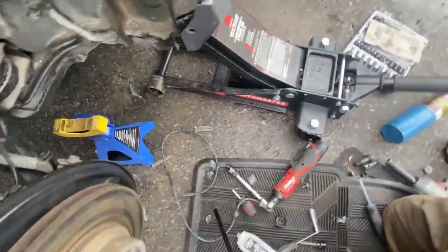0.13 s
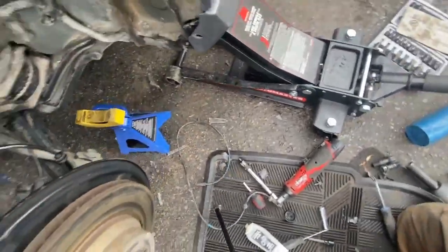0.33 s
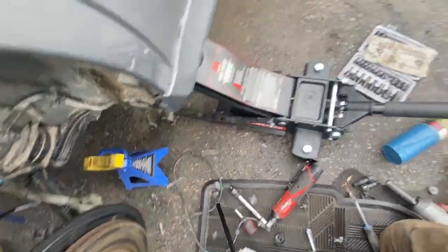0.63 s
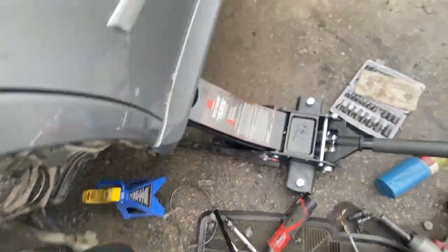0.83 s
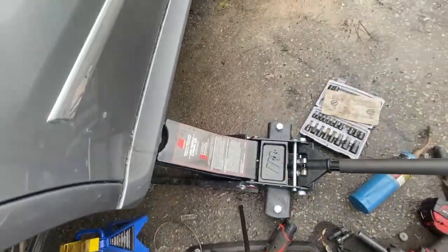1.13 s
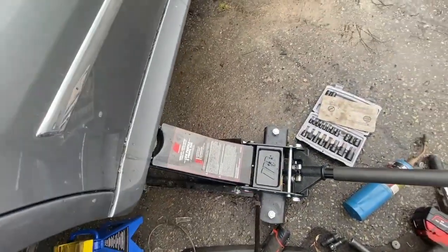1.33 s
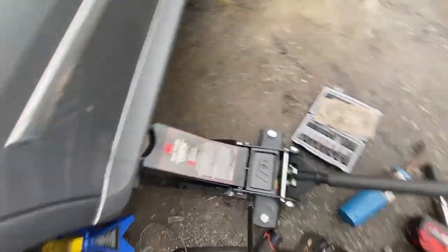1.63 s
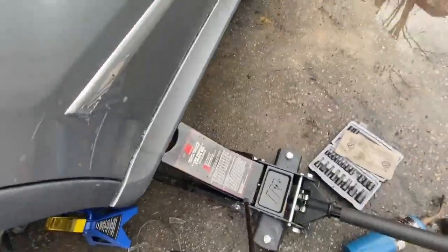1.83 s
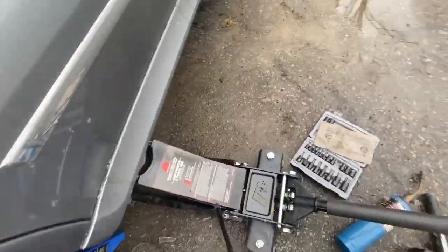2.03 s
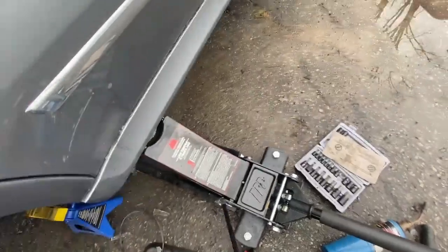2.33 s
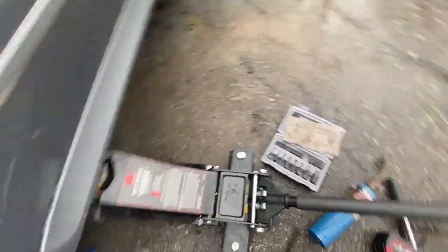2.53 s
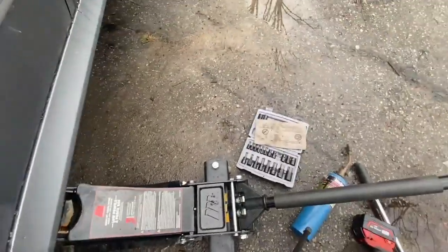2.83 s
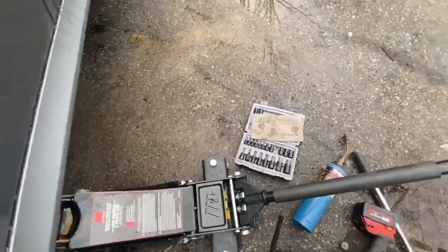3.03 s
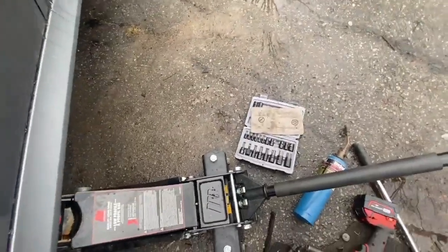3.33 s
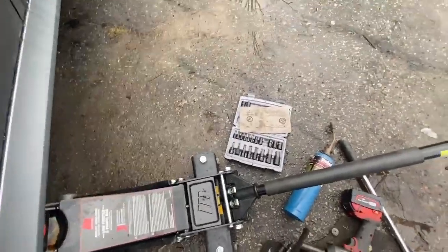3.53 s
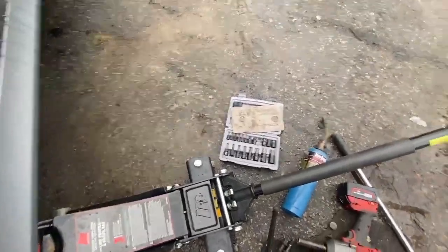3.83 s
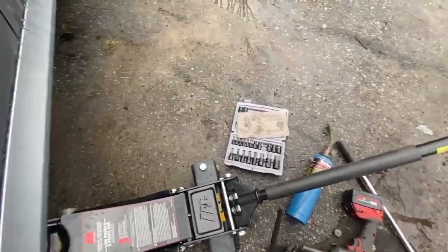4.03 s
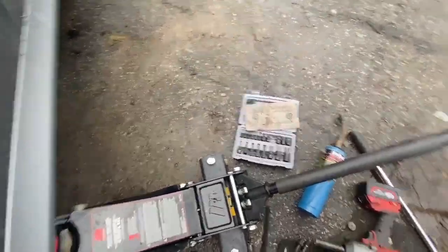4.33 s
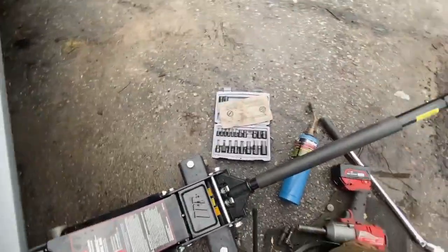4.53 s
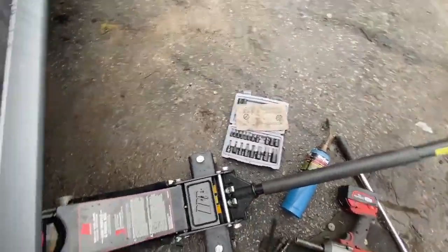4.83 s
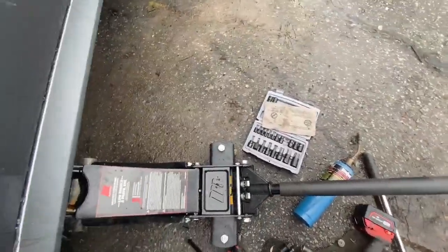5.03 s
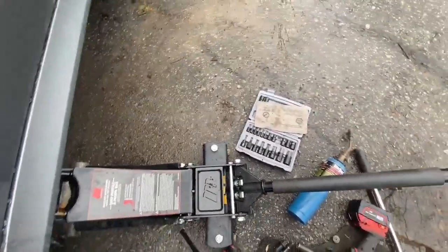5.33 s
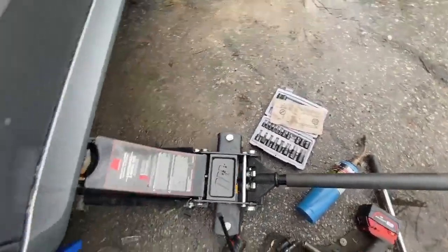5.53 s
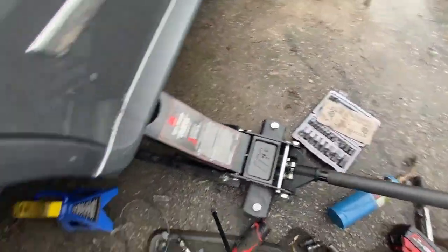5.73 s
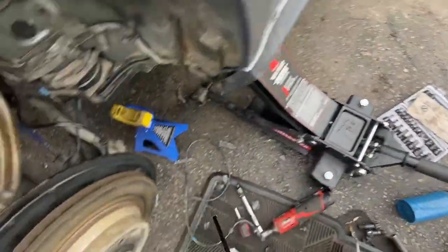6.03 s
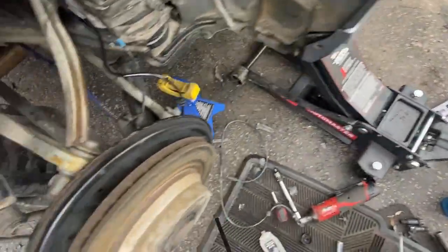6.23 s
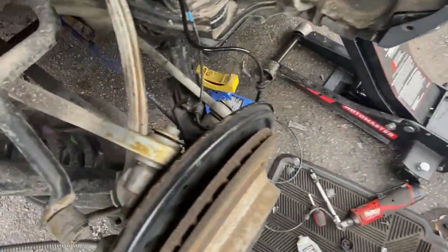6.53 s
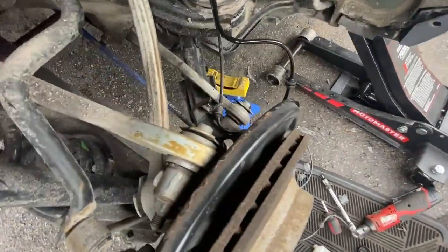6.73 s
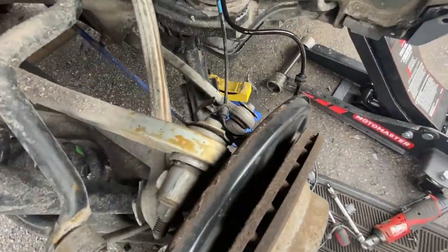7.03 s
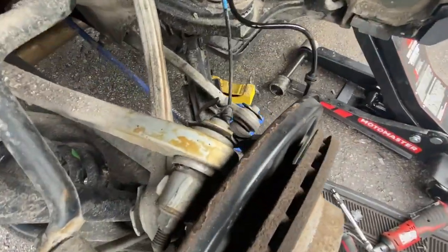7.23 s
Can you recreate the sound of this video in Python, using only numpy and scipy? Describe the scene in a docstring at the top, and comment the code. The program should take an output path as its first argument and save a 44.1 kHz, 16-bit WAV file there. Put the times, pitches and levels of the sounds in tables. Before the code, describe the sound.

Loose steel jack handle clanks and rattles irregularly in its socket on an outdoor driveway, with scuffs, metal rubbing, one creak, then low rumbling quiet.

```python
"""First a scuff of cloth and soles over a low outdoor rumble, then the rattle of a steel floor jack on a driveway.
The long loose handle strikes in its socket: each blow sets off decaying modes of tube and frame and a noise crash.
Between blows the joint rubs as random slips into the frame, and creaks once as a train of stick-slip snaps.
A wall six or seven metres off returns one smeared echo; low thuds pass into the ground.
A tap, a thin whistle and a steady wash lie behind; at the microphone peaks are rounded and the top is cut."""
import sys
import numpy as np
from scipy import signal
from scipy.fft import rfft, irfft, next_fast_len
from scipy.io import wavfile
from scipy.ndimage import uniform_filter1d

SR = 44100
rng = np.random.default_rng(int(sys.argv[2]) if len(sys.argv) > 2 else 0)


def put_to_file(sound):
    """Save the sound as 16-bit audio at rate SR, in the file named by the first command-line argument."""
    columns = np.atleast_2d(sound).T  # one column per channel
    safe = np.clip(columns, -1, 1)
    whole_steps = np.round(safe * 32767)
    wavfile.write(sys.argv[1], SR, whole_steps.astype(np.int16))


N = 326063
TIME = np.arange(N) / SR
AGE = np.arange(SR // 5) / SR   # seconds since a blow

# Blows of the handle in its socket. Each row: start in seconds, contact time in seconds, strength in dB,
# looseness from 0 (seated against the frame) to 1 (hanging free).
HANDLE_BLOWS = [(0.1376, .0016, -41, 0.45), (0.1715, 0.0014, -39.5, .15), (.183, 0.00056, -33, 0.17),
                (.2137, 0.00064, -36, .15), (0.5833, 0.0016, -20.5, 0.28), (0.6507, 0.001, -29, 0.78),
                (0.7715, 0.0014, -22.5, 0.66), (1.017, 0.0006, -25.5, 0.65), (1.5677, 0.0016, -37, 0.23),
                (1.5927, 0.0023, -34, 0.38), (1.6908, 0.001, -17.5, 0.67), (1.783, .0017, -26, 0.089),
                (1.8767, 0.0018, -21, 0.74), (2.1118, .001, -29, 0), (2.1668, 0.0024, -43.5, 0),
                (2.221, 0.0011, -26, 1), (2.3349, 0.0021, -23, 0.12), (2.427, 0.0019, -18.5, 0.56),
                (2.6521, 0.0016, -30.5, 0), (2.6554, 0.0029, -23.5, 0.49), (2.6741, .0013, -24, 1),
                (2.7013, 0.001, -25.5, 0.32), (2.7108, 0.00124, -20.5, 1), (2.8268, 0.0019, -41, 0.48),
                (2.847, 0.00058, -41, 0.66), (2.9078, .0012, -45, 0.61), (2.9796, 0.00094, -38, 0.29),
                (3.06, 0.0027, -27.5, 0.36), (3.0657, 0.0021, -25.5, .2), (3.1036, .0011, -37, 0.66),
                (3.117, 0.0012, -39, .4), (3.1258, 0.0011, -19.5, 0.53), (3.1927, 0.0016, -25, 0.19),
                (3.2319, 0.00088, -40, 0.34), (3.2542, 0.0012, -17, 0.87), (3.373, 0.00092, -40, 0.21),
                (3.4149, 0.0037, -31.5, 0.13), (3.43, 0.0012, -23.5, 0.25), (3.457, 0.0018, -39, 0.65),
                (3.4878, 0.0019, -23, 0.85), (3.5471, 0.0016, -25.5, 0.37), (3.5978, 0.00078, -16, 0.82),
                (3.714, .0003, -37.5, 0.22), (3.7322, 0.00087, -44, 0.08), (3.792, 0.0014, -29, 0.11),
                (3.7991, 0.0019, -28, 0.28), (3.844, 0.0018, -33, 0.59), (3.8526, 0.0012, -21, 0.59),
                (3.9329, 0.0023, -33.5, 0.27), (3.998, 0.0029, -16.5, 0.9), (4.066, 0.00066, -42, .4),
                (4.2233, 0.00087, -50, 0.14), (4.4062, 0.00065, -43, 0.15), (4.4273, 0.00071, -41.5, 0.48),
                (4.5606, 0.0019, -31, 0.32), (4.58, 0.0019, -42.5, 0.045), (4.609, 0.0018, -36, 0.56),
                (4.63, 0.001, -24, 0.62), (4.787, .002, -46, 0.76), (4.8054, 0.00045, -32, 0.69),
                (4.8169, 0.0011, -32.5, 0.59), (4.843, .001, -45, 0.41), (4.892, 0.001, -38.5, 0.23),
                (4.991, .0023, -20.5, 1), (5.245, 0.00093, -47, 0.57), (5.331, .0013, -26, 0.32),
                (5.3673, 0.0014, -36, 0.37), (5.3808, .0022, -19, 0.59), (5.3897, 0.0022, -29, 0.43),
                (5.5008, 0.0016, -39.5, 0.16), (5.5546, 0.0012, -37.5, 0.27), (5.6071, 0.0015, -22.5, 0.64),
                (6.2393, 0.0033, -53, 0.31), (6.302, 0.003, -49, 0.21), (7.3398, 0.00069, -40, 0),
                (7.3471, 0.0025, -39.5, 0.029)]
# How a blow feeds knock, clack, clang, ting and shimmer. Each row: share when seated in dB, share when loose in dB,
# growth in dB per dB of strength.
BLOW_DRIVE = [(0, -26, 0.81), (-6.5, -17, 1), (-3, 1.5, .97), (3, -4.5, 1.09), (-23.5, -10.5, 0.8)]
FIRM_BLOW_DB = -25   # the strength at which these shares hold
# Registers of knock, clack, clang, ting and shimmer. Each row: low edge in Hz, high edge in Hz,
# crash of dense weak modes in dB, its t60 in seconds, lingering ring in dB, onset delay in seconds.
REGISTERS = [(151, 790, -5.5, 0.033, -43, 0.00026), (905, 3797, 2.5, 0.017, -20.5, .0001),
             (3430, 5626, 0.5, 0.015, -15, .0001), (5540, 12400, 1, 0.023, -11.5, .0005),
             (11600, 18600, 13, 0.018, -12, .0004)]
# Modes of the frame (low) and handle (high). Each row: pitch in Hz, level when seated in dB,
# level when loose in dB, t60 in seconds.
JACK_MODES = [(210.7, -9, 3, 0.054), (315, 0, -1.5, 0.012), (438, 3, 4.5, 0.043), (483.5, 3.5, 2.5, 0.035),
              (573, 0, -13.5, 0.042), (627, 0, -3, 0.044), (680, -1.5, -15, 0.053), (1780, -20, 9, 0.025),
              (1804, 3.5, 1, 0.013), (2140, 2, -40, 0.026), (2600, 13.5, -12, 0.0079),
              (2794, 9, -11, 0.021), (3447, 0, -20.5, 0.078), (3800, 1.5, -15, 0.057),
              (4484, 0, -6.5, 0.022), (4633, 11, -40.5, 0.0094), (5100, 8, 4.5, 0.017),
              (5195, 4.5, 6.5, 0.016), (5320, -16, 10, 0.03), (5550, 7, -5.5, 0.0084),
              (6540, -8, -0.5, 0.014), (7017, 0, 5, 0.035), (7580, -9, 0.5, 0.035),
              (7990, -16, -6.5, 0.0094), (7870, -13, 11, 0.023), (8380, -3, -1, 0.026),
              (9730, 4.5, 0, 0.017), (9670, 0.5, -31, 0.03), (11360, -13.5, -3, 0.026),
              (11260, -16, -10.5, 0.025), (13000, -46, -4.5, 0.11), (13900, -32, 13, .025),
              (15600, -13, -28, 0.048), (15700, -18, -25, 0.038)]
# Pure high ringing after four blows. Each row: start in seconds, level in dB.
RING_OUTS = [(1.019, -32), (2.2225, -20), (4.632, -29.5), (5.334, -34)]
# One dry snap of the joint catching: start in seconds, gain in dB.
SNAP = (0.1833, -8.5)
# Its quickly damped modes. Each row: pitch in Hz, level in dB, t60 in seconds.
SNAP_MODES = [(4450, -1.5, 0.0089), (4800, -1, 0.0062), (9700, -7, 0.0044)]
# The frame rocking and bumping dully on the ground. Each row: start in seconds, level in dB.
FRAME_BUMPS = [(0.922, -38), (1.073, -39.5), (1.1078, -41.5), (1.367, -37), (1.4125, -40), (1.454, -36),
               (1.578, -40), (2.09, -35), (2.869, -37.5), (3.783, -39), (4.528, -32), (5.169, -44.5),
               (5.2933, -36), (5.451, -42), (5.651, -44), (5.694, -39), (7.357, -47)]
BUMP_CONTACT_S, BUMP_RATTLE_DB = 0.00178, -14.5   # a bump stirs the higher registers only faintly
# Strokes of the joint rubbing. Each row: peak time in seconds, length in seconds, level in dB before each layer's gain.
RUB_STROKES = [(0.204, 0.097, -34.5), (1.036, 0.36, -45.5), (1.465, 0.15, -30.5), (1.591, 0.18, -35),
               (1.856, 0.5, -43), (2.105, 0.067, -37.5), (2.355, 0.5, -45.5), (2.62, 0.48, -41),
               (2.794, 0.14, -60), (3.068, 0.17, -36.5), (3.273, 0.16, -38), (3.43, 0.15, -39.5),
               (3.79, 0.3, -39.5), (4.515, 0.16, -37.5), (4.749, 0.23, -41), (5.335, 0.24, -50),
               (5.623, 0.24, -45)]
# Each stroke of rubbing shakes a light tick out of the handle, scattered about the peak by a share of its length.
TICK_DB, TICK_SPREAD_DB, TICK_CONTACT_S, TICK_LOOSENESS = -50, 5, 0.00097, 0.15
TICK_SCATTER = 0.2
# The joint creaking. Each row: time in seconds, slips per second before jitter, level in dB before the creak's gain.
CREAK_SLIPS = [(1.815, 227, -49), (1.861, 200, -33), (1.898, 184, -31), (1.939, 165, -30.5),
               (1.971, 182, -31), (1.998, 120, -32.5), (2.026, 138, -38), (2.05, 95, -44)]
# Thud of the ground: level against its knock in dB, length and lag of its peak in seconds, share of rubbing in dB.
THUD_DB, THUD_S, THUD_DELAY_S, RUB_THUD_DB = -12, 0.044, 0.025, -10.5
# Cloth and soles scuffing. Each row: peak time in seconds, length in seconds, level in dB before the scuff's gain.
SCUFF_STROKES = [(.01, 0.33, -47), (.25, 0.14, -35.5), (.395, 0.16, -36), (.57, 0.26, -40),
                 (.78, 0.52, -46.5), (2.29, 0.61, -49), (2.7, 0.12, -35), (3.54, 0.28, -44),
                 (4.22, 0.28, -43), (4.55, 0.21, -40), (4.77, 0.34, -46.5), (5.69, 0.13, -51),
                 (7.38, 0.11, -49)]
# Spectrum of scuffs and grit. Each row: frequency in Hz, relative density in dB.
SCUFF_COLOUR = [(700, -2.5), (1500, 1.5), (2500, 3.5), (3600, 5), (5200, 3.5), (7000, 1), (10000, -2),
                (15500, -5.5)]
RUB_HISS_DB, RUSTLE_DB = -9.5, -57   # hiss of the joint against its rubbing; steady rustle of clothes
# Every stroke swells alike: share of its length spent rising, fall at its ends in dB, roundness of its top.
RISE_SHARE, EDGE_DB, ROUNDNESS = 0.52, 19, 1.43
# One broad, soft rush of mid-band noise. Each row: peak time in seconds, length in seconds, level in dB.
RUSH_SWELLS = [(.66, 0.67, -40.5)]
# Spectrum of the rush. Each row: frequency in Hz, relative density in dB.
RUSH_COLOUR = [(600, 6.5), (1000, 0), (1600, -2.5), (2400, -10.5)]
# A dull tap further off: start in seconds, gain in dB.
TAP = (7.154, -35.5)
# Its hollow modes. Each row: pitch in Hz, level in dB, t60 in seconds.
TAP_MODES = [(910, 9, 0.024), (1110, -5, 0.05), (1376, -9, 0.058), (1421, 1, 0.044)]
# A faint, thin whistle far off. Each row: peak time in seconds, length in seconds, level in dB.
WHISTLE_SWELLS = [(6.0, 0.2, -52), (7.2, .2, -62)]
WHISTLE_HZ = 3250   # centre of its wavering
# Outdoor rumble. Each row: time in seconds, level in dB before its wavering.
RUMBLE_LEVEL = [(0, -44), (.7, -47), (1.6, -51), (2.3, -50.5), (2.9, -50.5), (3.6, -53), (4.3, -48.5),
                (4.9, -49.5), (5.25, -46), (5.7, -52), (6.2, -42), (7.39, -43.5)]
# Spectrum of the rumble and of the thuds. Each row: frequency in Hz, relative density in dB.
RUMBLE_COLOUR = [(30, -32), (42, -20), (60, 0.5), (100, -2), (160, -3.5), (240, -8.5), (400, -30.5),
                 (900, -30.5)]
# Spectrum of the steady distant wash. Each row: frequency in Hz, relative density in dB.
AIR_COLOUR = [(150, 2), (300, 4), (600, -2.5), (1000, -5.5), (2000, -11), (4000, -17.5), (15000, -32)]
AIR_DB = -52.5
CUTOFF_HZ = 15900


def from_db(db):
    """Decibels to gain."""
    return 10 ** (np.asarray(db) / 20)


def rms_one(x):
    """Scale each row to rms 1."""
    return x / np.sqrt(np.mean(x ** 2, axis=-1, keepdims=True) + 1e-20)


def attack_one(x):
    """Scale each row to rms 1 over its first 10 ms."""
    return x / np.sqrt(np.mean(x[..., :SR // 100] ** 2, axis=-1, keepdims=True) + 1e-20)


def level(rows):
    """Gain in time from rows (seconds, .., dB), practically silent outside them."""
    rows = np.array(rows)
    return from_db(np.interp(TIME, rows[:, 0], rows[:, -1], left=-120, right=-120))


def swells(rows):
    """Gain in time of strokes (peak seconds, length seconds, dB) that rise to a peak and fade."""
    power = np.zeros(N)
    for s, length, db in rows:
        near = slice(max(int((s - 2 * length) * SR), 0), int((s + 2 * length) * SR))
        since = (TIME[near] - s) / length
        away = np.maximum(-since / RISE_SHARE, since / (1 - RISE_SHARE))   # 0 at the peak, 1 at the ends
        power[near] += from_db(db - EDGE_DB * away ** ROUNDNESS) ** 2
    return np.sqrt(power)


def band(x, low, high):
    """Causal band-pass."""
    return signal.sosfilt(signal.butter(2, [low, min(high, .45 * SR)], "band", fs=SR, output="sos"), x)


def drift(rate):
    """Random wander of rms 1, with `rate` knots per second."""
    knots = rng.standard_normal(int(N / SR * rate) + 2)
    return rms_one(np.interp(TIME * rate, np.arange(len(knots)), knots))


def coloured(x, colour):
    """Shape the spectrum of a sound, with falling skirts beyond the table; rms 1."""
    hz, db = np.transpose(colour)
    size = next_fast_len(N, True)
    f = np.maximum(np.arange(size // 2 + 1) * SR / size, 1)
    skirts = np.minimum(f / hz[0], 1) ** 2 * np.minimum(hz[-1] / f, 1) ** 2
    gain = skirts * from_db(np.interp(np.log(f), np.log(hz), db))
    return rms_one(irfft(rfft(x, size) * gain, size)[:N])


def grains(per_s, spread_db):
    """Random tiny contacts of uneven size; rms 1."""
    sizes = from_db(spread_db * np.minimum(rng.exponential(1, N), 4)) * rng.choice([-1, 1], N)
    return rms_one(sizes * (rng.random(N) < per_s / SR))


def dying(t60):
    """Exponential decay by 60 dB in t60 seconds."""
    return np.exp(-np.log(1000) * AGE / t60)


def rings(modes):
    """One decaying sine per mode (Hz, dB, t60)."""
    return np.array([from_db(db) * np.sin(2 * np.pi * hz * AGE) * dying(t60) for hz, db, t60 in modes])


def add(out, s, sound):
    """Mix a sound in at a time in seconds."""
    i = max(int(s * SR), 0)
    out[i:i + len(sound)] += sound[:N - i]


def blows():
    """Times, contact times, looseness and register levels: a seated handle knocks the frame, a loose one rings."""
    chance = rng.standard_normal((len(RUB_STROKES), 2))
    ticks = []
    for (s, length, _), (when, size) in zip(RUB_STROKES, chance):
        at = s + TICK_SCATTER * length * when
        ticks.append((at, TICK_CONTACT_S, TICK_DB + TICK_SPREAD_DB * size, TICK_LOOSENESS))
    s, contact, db, loose = np.transpose(HANDLE_BLOWS + ticks)
    levels = []
    for seated_db, loose_db, growth in BLOW_DRIVE:
        share_db = (1 - loose) * seated_db + loose * loose_db
        levels.append(FIRM_BLOW_DB + growth * (db - FIRM_BLOW_DB) + share_db)
    return np.array([s, contact, loose, *levels])


def bumps():
    """The same for bumps of the frame: a full knock, with little of the handle."""
    rows = []
    for s, db in FRAME_BUMPS:
        middle = (db + BUMP_RATTLE_DB,) * (len(BLOW_DRIVE) - 2)
        rows.append((s, BUMP_CONTACT_S, 0, db) + middle + (db + 2 * BUMP_RATTLE_DB,))
    return np.transpose(rows)


def contact_force(contact):
    """Brief chatter that swells and fades; hard steel contacts drive all pitches about equally."""
    phase = AGE[:SR // 50] / contact[:, None]
    press = phase ** 2 * np.exp(-1.5 * phase)
    # keep the timing of the noise but level its spectrum
    chatter = irfft(np.exp(1j * np.angle(rfft(press * rng.standard_normal(press.shape)))))
    return np.sqrt(press) * chatter


def clinks(hits, linger_t60=0.12, vary_db=5.0, loose_crash_db=-7.5, freeing=1.43, skirt=0.82):
    """Each blow's contact force rings every mode of the jack with a strength of its own."""
    s, contact, looseness, *levels = hits
    force = contact_force(contact)
    # a loose blow lets the tube clang purely; a seated one rattles the small parts
    loose = np.clip(.5 + freeing * (looseness - .5), 0, 1)[:, None]
    out = np.zeros(N)
    for (low, high, dense_db, dense_t60, linger_db, delay), db in zip(REGISTERS, levels):
        hz, seated_db, loose_db, t60 = np.transpose([m for m in JACK_MODES if low <= m[0] < high])
        shape = (len(s), len(hz))
        mode_db = (1 - loose) * seated_db + loose * loose_db
        strength = from_db(mode_db + vary_db * rng.standard_normal(shape))
        body = attack_one((strength * rng.choice([-1, 1], shape)) @ rings(zip(hz, 0 * hz, t60)))
        # all modes also ring on faintly, with strengths drawn anew for every blow
        lingering = np.sqrt(strength) * rng.standard_normal(shape)
        body = body + from_db(linger_db) * attack_one(lingering @ rings((f, 0, linger_t60) for f in hz))
        # the handle sits a little differently each time, which shifts its pitch
        stretch = 1 + .004 * rng.standard_normal(len(s))
        body = np.array([np.interp(AGE * k, AGE, row) for k, row in zip(stretch, body)])
        # the many weak modes of the linkage merge into a short crash
        crash_decay = dying(dense_t60) + .5 * from_db(linger_db) * dying(linger_t60)
        crash = attack_one(band(rng.standard_normal(body.shape) * crash_decay, low, high))
        body = body + from_db(dense_db + loose * loose_crash_db) * crash
        # each part radiates little below its own register
        body = band(body, skirt * low, SR / 2)
        struck = attack_one(signal.fftconvolve(force, body, axes=1))
        for at, sound in zip(s, from_db(db)[:, None] * struck):
            add(out, at + delay, sound)
    return out


def ring_outs(ring_t60=0.065, swell_s=0.0072, vary_db=0.5, lowest_hz=3300, favour=0.65, tilt_db=-5.0):
    """Pure high ringing: sines with a shared decay and a soft onset, tilted in favour of the lower ones."""
    out = np.zeros(N)
    high_modes = []
    for hz, seated_db, loose_db, t60 in JACK_MODES:
        if hz > lowest_hz:
            damping_db = favour * 20 * np.log10(t60)
            high_modes.append((hz, max(seated_db, loose_db) + damping_db + tilt_db * np.log2(hz / lowest_hz)))
    for (s, db), chance in zip(RING_OUTS, rng.standard_normal((len(RING_OUTS), len(high_modes)))):
        modes = rings((hz, mode_db + vary_db * c, ring_t60) for (hz, mode_db), c in zip(high_modes, chance))
        ring = (-1) ** np.arange(len(high_modes)) @ modes * (1 - dying(swell_s))
        add(out, s, from_db(db) * attack_one(band(ring, lowest_hz, SR / 2)))
    return out


def snap():
    """A tight contact of the joint: a few high modes that are damped at once."""
    out = np.zeros(N)
    add(out, SNAP[0], from_db(SNAP[1]) * rings(SNAP_MODES).sum(0) * (1 - dying(0.00085)))
    return out


def frame(force, low_hz, high_hz=900):
    """The seated jack's modes within a range, driven by a force."""
    modes = rings([(hz, db, t60) for hz, db, _, t60 in JACK_MODES if low_hz < hz < high_hz])
    return signal.fftconvolve(force, (-1) ** np.arange(len(modes)) @ modes)[:N]


def rub(rubbing, gain_db=-1., rasp_db=-15.0):
    """Steel sliding on steel: uneven small slips into the frame, with a rasp from the tube."""
    slips = grains(450, 5.4)
    rasp = from_db(rasp_db) * rms_one(frame(slips, 3100, 8000))
    return from_db(gain_db) * rubbing * (rms_one(frame(slips, 250)) + rasp)


def jingle(rubbing, per_s=70, gain_db=-12, limit_db=-40):
    """While the joint rubs, the handle chatters lightly in its socket."""
    chatter = rms_one(frame(grains(per_s, 10.0), 3100, 12000))
    return from_db(gain_db) * np.minimum(rubbing, from_db(limit_db)) * chatter


def creak(jitter=.085, uneven_db=2.0, snap_db=-16.5, rasp_db=-11., groan_db=-2.0, gain_db=-3.0):
    """The joint sticks and slips in a broadly slowing train; each slip snaps and rings the frame."""
    s, per_s, _ = np.transpose(CREAK_SLIPS)
    rate = np.interp(TIME, s, per_s)
    turns = np.cumsum(rate * (1 + jitter * drift(150))) / SR
    slips = np.diff(np.floor(turns), prepend=0) * from_db(uneven_db * rng.standard_normal(N))
    body = frame(slips, 250) + 1e-9
    body = body / np.sqrt(uniform_filter1d(body ** 2, size=2000) + 1e-12)   # even out its level
    # a groan at the slip rate swells as that rate nears the lowest frame mode
    off_pitch = (rate - JACK_MODES[0][0]) / 22
    groan = np.sin(2 * np.pi * turns) * np.sqrt(2 / (1 + off_pitch ** 2))
    rasp = from_db(rasp_db) * rms_one(band(slips, 570, 1720))
    snaps = from_db(snap_db) * rms_one(band(slips, 1600, 3400))
    return from_db(gain_db) * level(CREAK_SLIPS) * (body + from_db(groan_db) * groan + rasp + snaps)


def thuds(hits, rubbing):
    """Knocks and rubbing of the frame pass into the ground as low thuds."""
    s, _, _, knock_db, *_ = hits
    weight = swells([(at + THUD_DELAY_S, THUD_S, db + THUD_DB) for at, db in zip(s, knock_db)])
    shaking = np.hypot(weight, from_db(RUB_THUD_DB) * rubbing)
    return shaking * coloured(rng.standard_normal(N), RUMBLE_COLOUR)


def scuff(rubbing, gain_db=-1.5, grit_db=-6.5, flutter_db=5.0, firm_db=-41.5):
    """A smooth hiss that turns uneven and gritty as the rubbing gets firm."""
    joint_hiss = from_db(RUB_HISS_DB) * rubbing
    friction = np.sqrt(swells(SCUFF_STROKES) ** 2 + joint_hiss ** 2 + from_db(RUSTLE_DB) ** 2)
    firm = np.clip(friction / from_db(firm_db), 0, 1)
    grit = from_db(grit_db) * firm * coloured(grains(600, 3.6), SCUFF_COLOUR)
    hiss = coloured(rng.standard_normal(N), SCUFF_COLOUR)
    return friction * from_db(gain_db + flutter_db * firm * drift(70)) * (hiss + grit)


def noise_rush():
    """Coloured noise that swells and fades."""
    return swells(RUSH_SWELLS) * coloured(rng.standard_normal(N), RUSH_COLOUR)


def crumbs(per_s=9, gain_db=-67):
    """Sparse, faint crackles of grit underfoot."""
    return from_db(gain_db) * coloured(grains(per_s, 1.4), SCUFF_COLOUR)


def driveway(x, wall_s=.0385, wall_db=-24.0, scatter_db=-19.0, scatter_t60=0.058):
    """One smeared echo from a wall, 13 m there and back, and a faint scatter from things around."""
    wall = band(rng.standard_normal(len(AGE)) * dying(0.037), 200, 19000)
    scatter_decay = dying(scatter_t60) * (1 - dying(0.01))
    scatter = band(rng.standard_normal(len(AGE)) * scatter_decay, 300, 4200)
    echo = from_db(scatter_db) * scatter / np.linalg.norm(scatter)
    add_at = int(wall_s * SR)
    echo[add_at:] += from_db(wall_db) * wall[:len(AGE) - add_at] / np.linalg.norm(wall)
    return x + signal.fftconvolve(x, echo)[:N]


def tap():
    """A soft, hollow tap: a few damped modes with a softened onset."""
    out = np.zeros(N)
    add(out, TAP[0], from_db(TAP[1]) * rings(TAP_MODES).sum(0) * (1 - dying(0.013)))
    return out


def whistle(waver_hz=40):
    """A thin sine tone whose pitch wavers at random."""
    hz = WHISTLE_HZ + waver_hz * drift(200)
    return swells(WHISTLE_SWELLS) * np.sin(2 * np.pi * np.cumsum(hz) / SR)


def outdoors(waver_db=1.5, wavers_per_s=8):
    """Low, wavering rumble and a steady distant wash, both of coloured noise."""
    waver = from_db(waver_db * drift(wavers_per_s))
    rumble = level(RUMBLE_LEVEL) * waver * coloured(rng.standard_normal(N), RUMBLE_COLOUR)
    return rumble + from_db(AIR_DB) * coloured(rng.standard_normal(N), AIR_COLOUR)


def scene():
    """The jack, tap and grit echo off the wall; thuds, scuffs, rush, whistle and outdoors arrive without echo."""
    hits, rubbing = np.hstack([blows(), bumps()]), swells(RUB_STROKES)
    jack = clinks(hits) + ring_outs() + snap() + rub(rubbing) + jingle(rubbing) + creak()
    unechoed = thuds(hits, rubbing) + scuff(rubbing) + noise_rush()
    return (driveway(jack + tap() + crumbs()) + unechoed + whistle() + outdoors())[None]


def record(dry):
    """The microphone's chain: the highest peaks are rounded and the top is cut steeply."""
    rounded = np.tanh(dry)
    return signal.sosfilt(signal.ellip(10, .1, 80, CUTOFF_HZ, fs=SR, output="sos"), rounded)


dry = scene()
out = record(dry)
put_to_file(out)
```